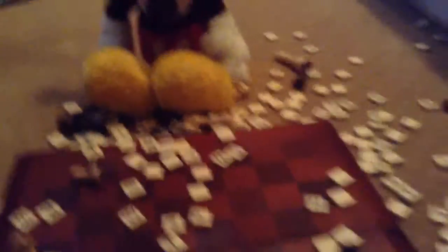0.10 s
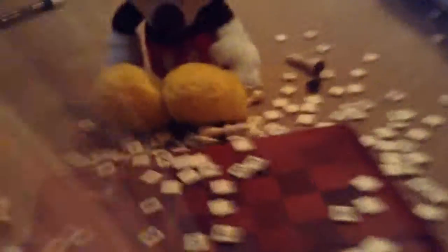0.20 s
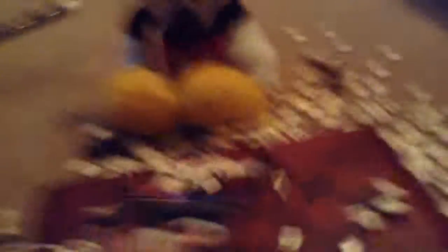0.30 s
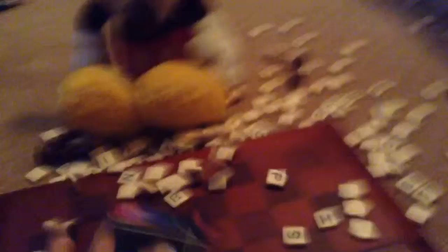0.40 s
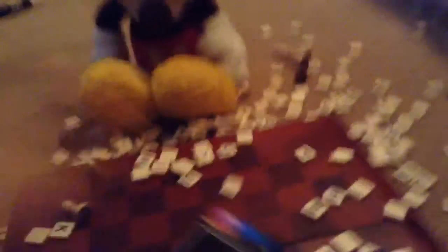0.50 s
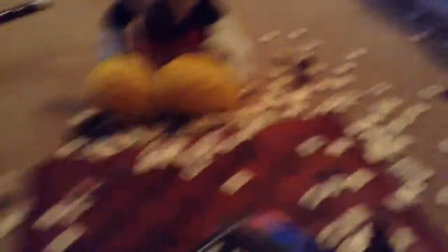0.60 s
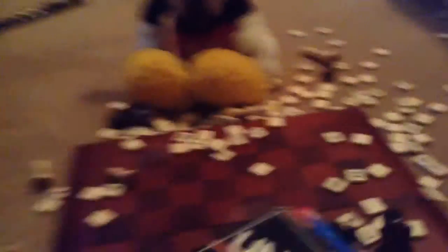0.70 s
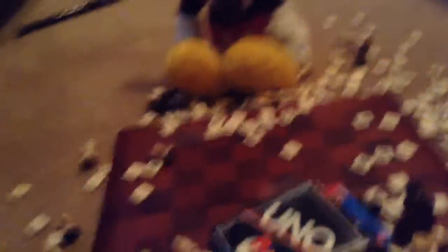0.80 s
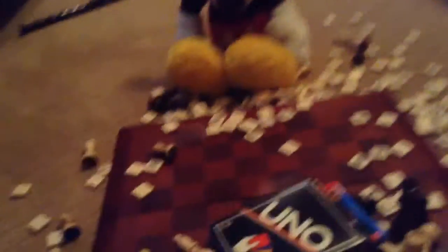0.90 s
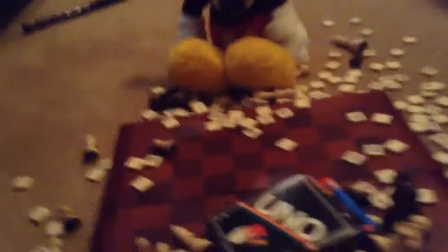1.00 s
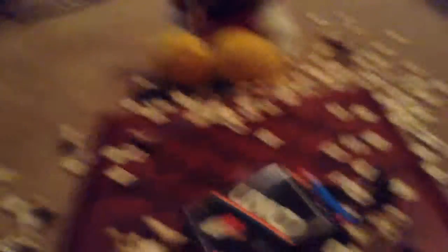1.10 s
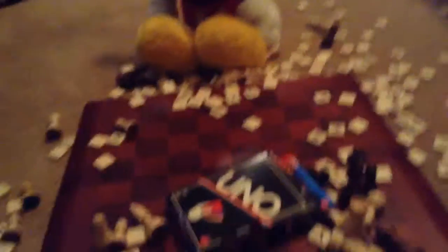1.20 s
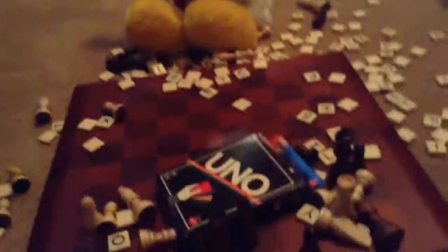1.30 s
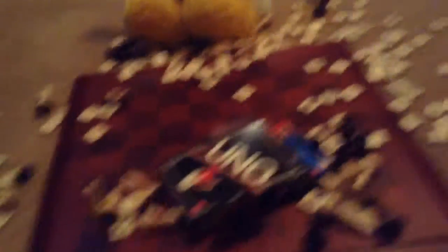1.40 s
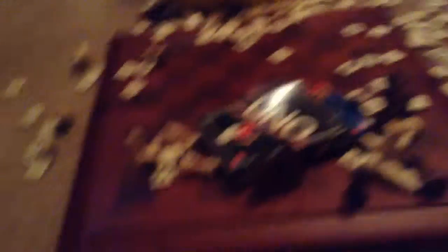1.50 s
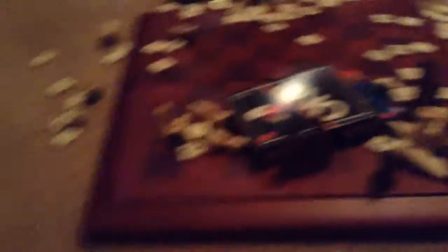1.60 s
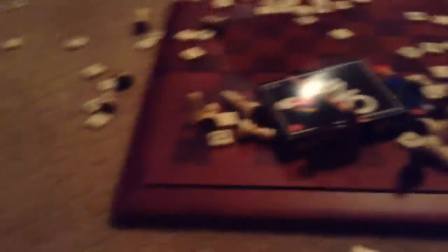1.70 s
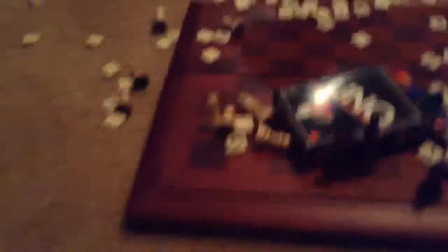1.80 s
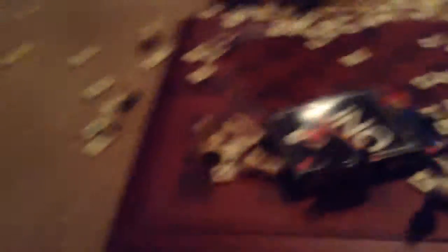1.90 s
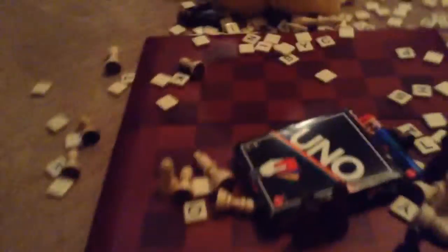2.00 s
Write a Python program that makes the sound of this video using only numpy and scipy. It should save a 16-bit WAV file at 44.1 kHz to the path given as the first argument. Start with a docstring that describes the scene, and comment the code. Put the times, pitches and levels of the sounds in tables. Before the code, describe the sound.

Wooden game pieces crash in a heap onto a wooden board, then clatter down to stray clacks

```python
"""Wooden pieces crash onto a board

A heap of wooden chess pieces, tiles and a tin drops onto a wooden board lying on carpet, close by.
A slide leads in, the heap crashes and thins to single clacks: noise cracks, short rings, board modes.
A small metal thing pings as high wavering sines, and pieces roll as fuzzy hums.
Heavy thuds ring low in the crash and again later, in a furnished room with quiet air."""
import sys
import numpy as np
from scipy import signal
from scipy.fft import rfft, irfft, next_fast_len
from scipy.io import wavfile
from scipy.ndimage import map_coordinates

SR = 44100
rng = np.random.default_rng(int(sys.argv[2]) if len(sys.argv) > 2 else 0)


def store_wav(level_fs):
    """Save 16-bit WAV to argv[1]."""
    pcm = np.round(np.clip(np.atleast_2d(level_fs), -1, 1) * 32767)
    wavfile.write(sys.argv[1], SR, pcm.T.astype(np.int16))


N = 92610  # samples, 2.1 s


def amp(db):
    """dB to gain."""
    return 10 ** (np.asarray(db) / 20)


def unit(x):
    """Bring to rms 1."""
    return x / np.sqrt(np.mean(x ** 2) + 1e-20)


def along(points, hz):
    """Read a curve of (Hz, value) points on a log frequency axis."""
    f, v = np.transpose(points)
    return np.interp(np.log(hz + 1), np.log(f + 1), v)


def filtered(x, response):
    """Multiply the spectrum of x by a complex response of frequency."""
    m = next_fast_len(N + SR // 2)
    return irfft(rfft(x, m) * response(np.fft.rfftfreq(m, 1 / SR)), m)[..., :N]


def lay(s, rows):
    """Sum each row of samples in at its start time."""
    at = np.round(s * SR).astype(int)[:, None] + np.arange(rows.shape[1])
    return np.bincount(at.ravel(), rows.ravel(), N + SR)[:N]


# Colour of the cracks and rings. Each row: frequency in Hz, relative level in dB.
CLICK_COLOUR = [(200, -35), (600, -3), (1000, -4), (2000, -1), (3900, 0), (7000, 0), (10400, 0),
                (13900, -5.5), (15500, -11)]
# How the board answers a push. Each row: mode frequency in Hz, width in Hz, relative level in dB.
BOARD_MODES = [(124.8, 60, -27), (232, 89, -0.5), (269, 58, 3.5), (386, 147, -6), (490, 93, -4.5),
               (686, 164, -1), (1034, 46, -1), (1423, 430, -4)]
WOOD_GAIN_DB, BOARD_GAIN_DB, TREBLE_GAIN_DB = 2.5, 13, 2.5  # added to every contact's levels
CRACK_T60, SNAP_T60 = 0.014, 0.002  # seconds to fall 60 dB: the crack, and its first instant
SNAP_SHARE = 0.9  # snap against the longer crack
RING_CYCLES, RING_DB = 17, -6  # cycles to fall 60 dB, starting level against the crack's peak
DULL_BELOW_HZ = 1800  # lower-ringing pieces crack more softly
TREBLE_HZ = 5640  # split between the wood and treble levels
PUSH_S = 0.00028


def clacks(s, db, board_db, treble_db, hz, size):
    """Each contact: a crack of noise, a short wooden ring and a push into the board."""
    t = np.arange(size) / SR
    decay = amp(-60 * t / CRACK_T60) + SNAP_SHARE * amp(-60 * t / SNAP_T60)
    crack = rng.standard_normal((len(s), size)) * decay
    crack = crack / np.abs(crack).max(axis=1, keepdims=True)
    pitch = hz[:, None]
    ring = np.sin(2 * np.pi * pitch * t) * amp(RING_DB - 60 * t * pitch / RING_CYCLES)
    hardness = np.clip(pitch / DULL_BELOW_HZ, 0, 1)

    wood = lay(s, amp(db + WOOD_GAIN_DB)[:, None] * (crack * hardness - ring))
    treble = lay(s, amp(treble_db + TREBLE_GAIN_DB)[:, None] * crack)
    low_pass = signal.butter(4, TREBLE_HZ, "low", fs=SR, output="sos")
    high_pass = signal.butter(4, TREBLE_HZ, "high", fs=SR, output="sos")
    click = signal.sosfilt(low_pass, wood) + signal.sosfilt(high_pass, treble)

    # a half-sine shove, up or down as the crack begins
    push = np.sign(crack[:, :1]) * np.sin(np.pi * np.clip(t / PUSH_S, 0, 1))
    pushes = lay(s, amp(board_db + BOARD_GAIN_DB)[:, None] * push)
    return filtered(click, lambda f: amp(along(CLICK_COLOUR, f))) + resonate(pushes, BOARD_MODES)


def resonate(x, modes):
    """A body rings in broad modes: causal band-passes summed with alternating sign."""
    def response(f):
        total = 0
        for k, (centre, width, db) in enumerate(modes):
            mode = 1j * f * width / (centre * centre - f * f + 1j * f * width)
            total = total + (-1) ** k * amp(db) * mode
        return total
    return filtered(x, response)


# Rattle level: the dense crash, then short rattling tails after the later clacks.
# Each row: time in seconds, then wood, board and treble level in dB before the grain offsets.
RATTLE_LEVELS = [(.212, -12, -12, -20), (.216, -9.5, -18, -11.5), (.26, -13.5, -19, -13.5),
                 (.41, -17.5, -30, -19), (.424, -26, -36, -24), (.446, -22, -44, -14),
                 (.49, -23, -34, -36.5), (.6, -29, -34.5, -34), (.676, -29, -41, -39),
                 (0.724, -40, -54, -43.5), (0.725, -20, -24, -37), (.744, -30, -43, -47.5),
                 (.778, -35.5, -45, -46.5), (.784, -28.5, -34, -45.5), (.806, -35, -58, -51.5),
                 (.852, -48, -46, -62.5), (.862, -38, -39, -48.5), (.914, -45, -54, -57),
                 (.981, -56.5, -45, -71), (0.983, -36, -44, -48), (1.047, -46, -60.5, -59.5),
                 (1.053, -42, -46, -51.5), (1.09, -46, -50, -57), (1.148, -63.5, -60, -70),
                 (1.152, -60.5, -58, -48), (1.25, -77.5, -67, -73.5)]
# Offset of one grain from the rattle level: wood, board, treble, each in dB.
GRAIN_DB = [-3, -8, -1.5]
HEAP_PER_S, HEAP_SPREAD_DB = 4300, 2.5  # mean contacts a second, spread of their levels
HEAP_HZ = 2590  # median ring pitch


def heap():
    """A random hail of small contacts: the dense crash, then rattling tails after later clacks."""
    at, *levels = np.transpose(RATTLE_LEVELS)
    u, z = rng.random(6000), rng.standard_normal((6000, 3))
    s = at[0] + np.cumsum(-np.log(1 - u)) / HEAP_PER_S  # random exponential gaps
    keep = s < at[-1]
    size_db = HEAP_SPREAD_DB * np.clip(z[:, 2], -2, 2)
    wood, low, high = [(np.interp(s, at, level) + offset + size_db)[keep]
                       for level, offset in zip(levels, GRAIN_DB)]
    hz = np.clip(HEAP_HZ * np.exp(0.55 * z[:, 0]), 500, 12000)
    return clacks(s[keep], wood, low, high + 3 * z[keep, 1], hz[keep], size=500)


# Single clacks, played through clacks().
# Each row: start in seconds, wood, board and treble level in dB before the gains, ring pitch in Hz.
SINGLE_CLACKS = [(0.0814, -44, -44, -53, 1790), (0.113, -45.5, -38.5, -59, 1810),
                 (0.1194, -41, -63, -57, 1780), (0.1834, -26.5, -44, -36, 4960),
                 (0.2123, 1.5, -3.5, -8, 2730), (0.2202, 3.5, -5, -19, 2110), (0.257, -6, -22, 1, 950),
                 (0.275, -9, -37, -16, 1670), (0.2811, -1.5, -9, -21, 3770), (0.2905, -23, -17, -7, 6460),
                 (0.3186, -9, -12.5, -0.5, 3130), (0.329, -12, -8, 2.5, 2200), (0.3443, -21, -23, 2, 5660),
                 (0.3705, -4, -11, -19, 3120), (0.3831, -9, -27, 0, 1820), (0.3977, 0.5, -9, -21, 1490),
                 (0.4061, -15, -14.5, -5, 5400), (0.4117, -4.5, -31, -6, 2990),
                 (0.4158, -28, -23, 0.5, 3210), (0.4345, -11, -35, -3.5, 1800),
                 (0.4376, -3.5, -37, -6, 4750), (0.4482, -16, -26, -11.5, 1400), (0.45, -13, -26, -1, 915),
                 (0.4562, -21, -46, -1, 4240), (0.4667, -8.5, -20.5, -3, 4210), (0.4773, 2, -36, 1.5, 6480),
                 (0.4782, -13, -42, -14.5, 6270), (0.5078, -5.5, -16, -19, 3800),
                 (0.5155, -6.5, -14.5, -9, 5580), (0.5204, -7, -26.5, -6, 2030),
                 (0.5387, -10, -25, -23.5, 1250), (0.5481, 0, -32, -11.5, 3260),
                 (0.556, -25, -28, 0.5, 6030), (0.5658, -17, -29, -17.5, 3740),
                 (0.572, -15, -32, -16, 1800), (0.574, -13, -30, -18, 3250),
                 (0.5907, -30, -30.5, -18, 1480), (0.5999, -7, -16.5, -17, 3600),
                 (0.6032, -5, -31.5, -24.5, 5080), (0.6267, -4, -23, -5.5, 3510),
                 (0.6578, -19, -30, -20, 1600), (0.663, -8.5, -30, -24.5, 3530),
                 (0.667, -18, -49, -6.5, 6090), (0.6745, -15.5, -23.5, -28, 2170),
                 (0.6984, -15.5, -24, -34, 2600), (0.7228, -20, -19, -39, 2040),
                 (0.725, -2.5, -12, -13, 1410), (0.728, -18.5, -27, -18, 960),
                 (0.78, -29, -19.5, -32, 5473), (0.7819, -14.5, -20.5, -30, 2800),
                 (0.788, -13.5, -33, -27, 2000), (0.7905, -16.5, -23, -47, 1680),
                 (0.8024, -26, -35, -41.5, 2870), (0.8118, -29, -36, -35.5, 900),
                 (0.8256, -24.5, -26.5, -49, 970), (0.8538, -26, -23.5, -34, 1380),
                 (0.8612, -21, -39, -37, 1730), (0.8655, -9, -37, -24, 4300),
                 (0.8685, -43, -31, -40.5, 3620), (0.8876, -31, -42, -39, 900),
                 (0.9377, -25, -44, -41, 4100), (0.9831, -13.5, -28, -21, 4030),
                 (1.002, -14.5, -48, -29, 2120), (1.0066, -15, -33, -26.5, 2030),
                 (1.0325, -25, -49, -30, 2720), (1.0498, -19, -39, -27.5, 2720),
                 (1.0539, -16.5, -57, -32.5, 1950), (1.0577, -24.5, -31.5, -38, 1560),
                 (1.0614, -36, -59, -47, 2500), (1.0891, -22.5, -34.5, -33.5, 2020),
                 (1.1509, -45, -52, -24, 6480), (1.1553, -51, -65, -27.5, 4690),
                 (1.184, -51, -49.5, -37, 5930), (1.1878, -53, -47.5, -43.5, 6000),
                 (1.2347, -36.5, -55.5, -56.5, 1200), (1.2626, -45, -64.5, -64, 993),
                 (1.3335, -47.5, -66, -55, 3580), (1.3585, -48.5, -59.5, -60, 1440),
                 (1.3663, -40.5, -51, -57.5, 1080), (1.4226, -46.5, -41.5, -48.5, 4500),
                 (1.4404, -46.5, -56, -53.5, 920), (1.4481, -50, -53, -55, 1120),
                 (1.4773, -25, -48.5, -48.5, 4960), (1.4843, -43, -45, -56, 1310),
                 (1.7278, -21.5, -68.5, -34.5, 1370), (1.7417, -31, -74, -52.5, 1448),
                 (1.8668, -44, -70.5, -58.5, 3600), (1.9347, -50, -68.5, -48, 4520),
                 (2.045, -42, -71, -45.5, 661)]


def single_clacks():
    """Separate contacts of single pieces, each with its own time, levels and pitch."""
    return clacks(*np.transpose(SINGLE_CLACKS), size=900)


# Heavy blows. Each row: start in seconds, push level in dB before a fixed lift, contact in seconds.
HEAVY_BLOWS = [(0.2123, -5, 0.0049), (0.2234, -4.5, 0.00087), (1.006, -35.5, 0.0032),
               (1.154, -42.5, 0.0043), (1.7270, -16, 0.0011), (1.7418, -16.5, 0.0012),
               (1.7554, -17, 0.0015), (1.7629, -19.5, 0.00077), (1.7729, -26.5, 0.0028),
               (1.7885, -36, 0.0017), (1.797, -28.5, 0.0036), (1.8150, -41, 0.0029), (1.846, -45.5, 0.0019),
               (1.857, -47, 0.0024), (1.882, -44, 0.00095), (1.912, -43, 0.0014), (1.9500, -53, 0.0022),
               (2.006, -56, .003), (2.0530, -47, 0.0013)]
# The heavier body they ring. Each row: mode frequency in Hz, width in Hz, relative level in dB.
THUD_MODES = [(112, 49, -13.5), (215.6, 36, -2.5), (251, 44, 0.5), (367, 140, -1), (513, 140, -5.5),
              (765, 80, -3.5), (1010, 73, -10.5), (1430, 200, -15)]


def thuds():
    """Soft heavy blows: a smooth push, as long as its contact, rings a heavier body's own low modes."""
    s, db, contact = np.transpose(HEAVY_BLOWS)
    t = np.arange(300) / SR
    push = np.sin(np.pi * np.clip(t / contact[:, None], 0, 1)) ** 2
    return resonate(lay(s, -amp(db + 7.5)[:, None] * push), THUD_MODES)


# Sliding and rolling, one level curve for each of three stretches.
# Each row: time in seconds, rms level in dB.
SLIDE_LEVELS = [
    [(0.04, -63), (0.086, -53), (0.204, -45), (0.208, -56), (0.212, -22)],
    [(1.2, -69.5), (1.23, -61.5), (1.328, -70), (1.334, -61), (1.444, -54.5), (1.47, -64.5), (1.478, -50),
     (1.56, -90)],
    [(1.73, -42), (1.778, -47.5), (2.0, -62), (2.008, -57.5), (2.1, -58)],
]
# Colour of the first, middle and last stretch. Each row: frequency in Hz, relative level in dB per Hz.
RUB_IN = [(71, -44.5), (120, -17.5), (380, -7), (592, -5.5), (655, -20), (710, -13.5), (1590, -7.5),
          (15000, -25.5)]
RUB_MID = [(71, -50), (120, -16), (243, -9.5), (403, -15), (484, -7), (961, -3.5), (4650, -23.5),
           (15000, -48)]
RUB_OUT = [(47, -48.5), (80, -21), (250, -9), (815, -4), (1160, -8.5), (1640, -10.5), (6390, -23.5),
           (12600, -24.5), (15000, -22)]


def slides():
    """Rubbing: coloured noise, roughened by a random grain, under each stretch's level."""
    t = np.arange(N) / SR
    # random level swings of about 4.3 dB, 250 points a second
    grain = amp(4.3 * map_coordinates(rng.standard_normal(N // 100), [t * 250]))
    total = np.zeros(N)
    for curve, colour in zip(SLIDE_LEVELS, (RUB_IN, RUB_MID, RUB_OUT)):
        noise = filtered(rng.standard_normal(N), lambda f: amp(along(colour, f)))
        s, db = np.transpose(curve)
        total += amp(np.interp(t, s, db, left=-150, right=-150)) * unit(grain * noise)
    return total


# Metal pings. Each row: start in seconds, level in dB before a fixed lift, pitch in Hz.
METAL_PINGS = [(0.8663, -39, 13120), (0.871, -48.5, 13180), (0.9836, -41.5, 13320), (1.0068, -55.5, 14800),
               (1.0517, -55.5, 13200), (1.151, -41.5, 14040), (1.1566, -56, 14000), (1.176, -60.5, 14100),
               (1.19, -63.5, 14040), (1.773, -60, 12430), (1.799, -56, 12330), (1.834, -55, 12100),
               (1.859, -56.5, 12800), (1.932, -48, 12540), (1.96, -63.5, 12270)]
PING_T60, PING_WAVER_HZ = 0.035, 220  # seconds to fall 60 dB, mean waver rate


def pings():
    """A small metal piece rings briefly and very high, its level wavering fast."""
    s, db, hz = np.transpose(METAL_PINGS)
    t = np.arange(3000) / SR
    rate = PING_WAVER_HZ * (0.5 + rng.random((len(s), 1)))
    waver = 1 + 0.6 * np.cos(2 * np.pi * rate * t)
    decay = amp(db[:, None] + 3 - 60 * t / PING_T60)
    return lay(s, decay * waver * np.sin(2 * np.pi * hz[:, None] * t))


# Two pieces rolling to rest, one curve each. Each row: time in seconds, level in dB, pitch in Hz.
ROLL_CURVES = [
    [(.79, -60, 1061), (.81, -45, 1057), (.88, -42, 1059), (.93, -52, 1086), (.975, -50, 1126),
     (.99, -70, 1090)],
    [(1.331, -79, 1350), (1.336, -55, 1326), (1.371, -55, 1206), (1.401, -61, 1100), (1.441, -67, 957),
     (1.5, -61, 903), (1.529, -73.5, 893)],
]
# How far each roll's hum is smeared: one width in Hz a piece.
ROLL_WIDTH_HZ = [70, 300]


def roll(rows, width_hz):
    """A rolling piece hums: a tone on a drawn pitch curve, smeared by slow noise."""
    s, db, hz = np.transpose(rows)
    t = np.arange(N) / SR
    turn = 2 * np.pi * np.cumsum(np.interp(t, s, hz)) / SR
    hum = fuzz(width_hz) * np.sin(turn) + fuzz(width_hz) * np.cos(turn)
    return amp(np.interp(t, s, db, -150, -150)) * hum


def fuzz(width_hz):
    """Slow noise that smears a tone to about this width."""
    return unit(filtered(rng.standard_normal(N), lambda f: 1 / (1 + (f / width_hz) ** 4)))


# How fast the room dies. Each row: frequency in Hz, seconds to fall 60 dB.
ROOM_T60 = [(200, 0.57), (1500, 0.44), (5000, 0.37), (14000, 0.26)]
ROOM_DB = -10.5  # gain of the unit-energy tail


def room(x):
    """A furnished room answers with a noise tail; each frequency dies at its own speed."""
    hz, t, z = signal.stft(rng.standard_normal(SR // 2), SR, nperseg=256)
    fading = z * amp(-60 * t / along(ROOM_T60, hz)[:, None])
    tail = signal.istft(fading, SR, nperseg=256)[1]
    late = np.pad(x, (150, 0))  # the answer starts 150 samples late
    return signal.fftconvolve(late, tail / np.linalg.norm(tail))[:N]


# Colour of the quiet air. Each row: frequency in Hz, relative level in dB per Hz.
AIR_COLOUR = [(35, -85), (60, -45.5), (215, -4.5), (242, -15), (443, -15), (613, -17), (673, -18.5),
              (2310, -22), (2780, -22), (3840, -26.5), (4520, -23.5), (15500, -29)]
AIR_DB = -62.5  # rms, before the microphone


def air():
    """Quiet steady background: coloured noise."""
    return amp(AIR_DB) * unit(filtered(rng.standard_normal(N), lambda f: amp(along(AIR_COLOUR, f))))


def scene():
    """All sources, the room's answer to all but the rubbing, and the quiet air."""
    rolls = sum(map(roll, ROLL_CURVES, ROLL_WIDTH_HZ))
    near = heap() + single_clacks() + thuds() + pings() + rolls
    return (near + amp(ROOM_DB) * room(near) + slides() + air())[None]


LOW_CUT_HZ, TOP_HZ = 81, 15450
CLIP_AT = 0.74  # ceiling that peaks approach


def record(dry):
    """The microphone drops the bass, clips softly and keeps nothing above its limit."""
    x = filtered(dry, lambda f: (1j * f / (LOW_CUT_HZ + 1j * f)) ** 3)
    x = x / (1 + np.abs(x / CLIP_AT) ** 6) ** (1 / 6)
    return filtered(x, lambda hz: hz < TOP_HZ)


dry = scene()
out = record(dry)
store_wav(out)
```